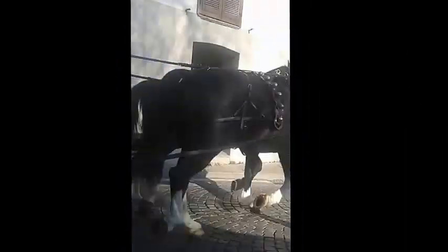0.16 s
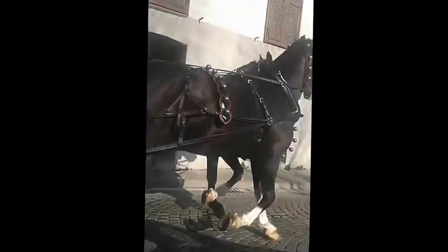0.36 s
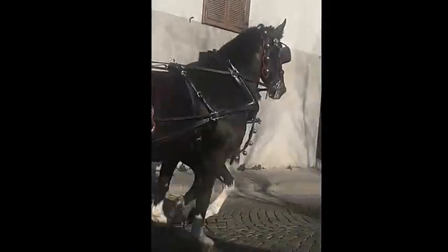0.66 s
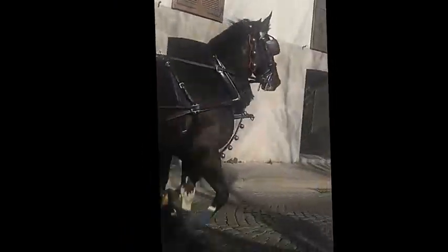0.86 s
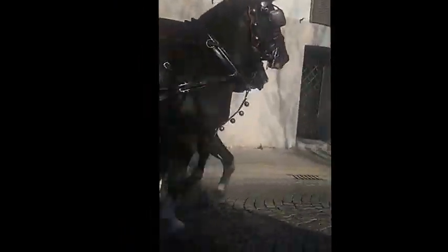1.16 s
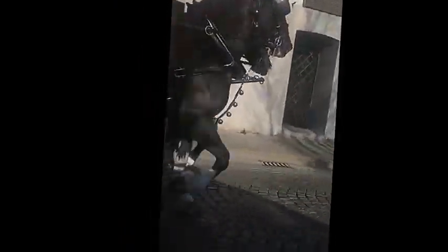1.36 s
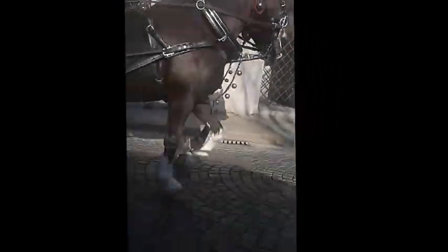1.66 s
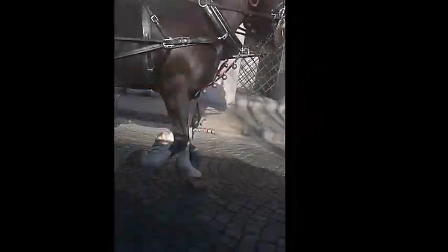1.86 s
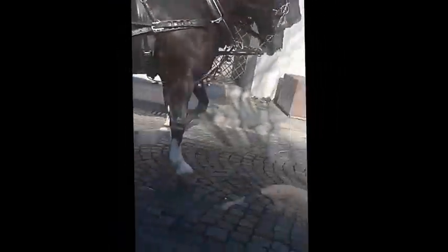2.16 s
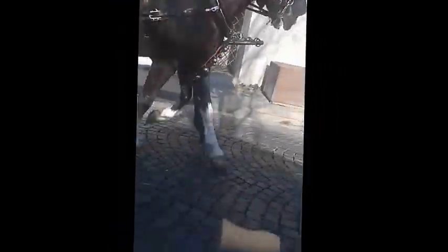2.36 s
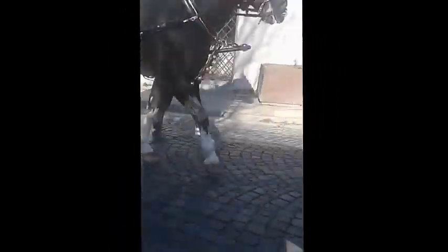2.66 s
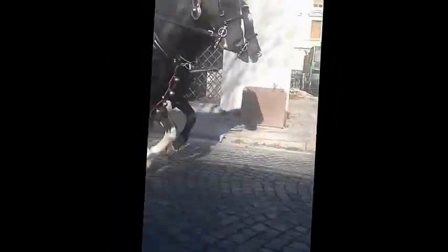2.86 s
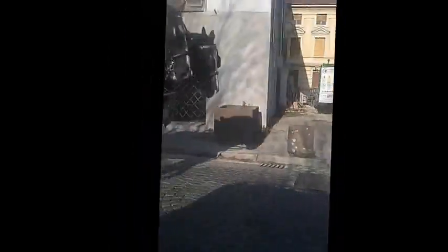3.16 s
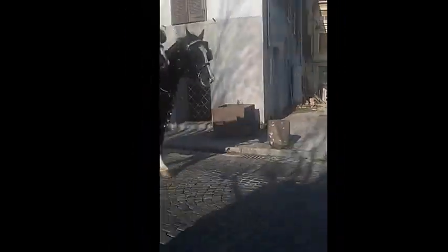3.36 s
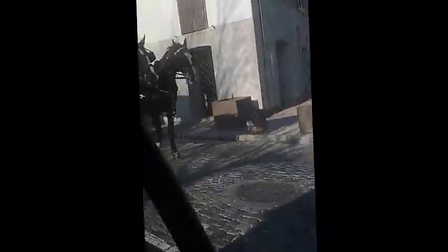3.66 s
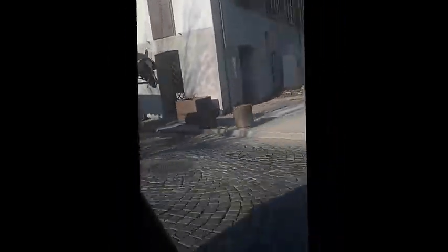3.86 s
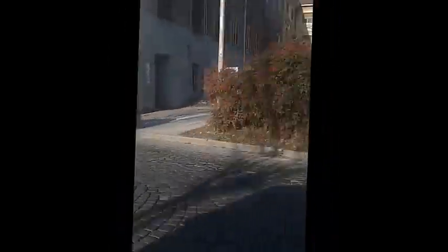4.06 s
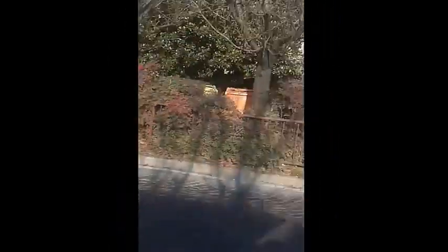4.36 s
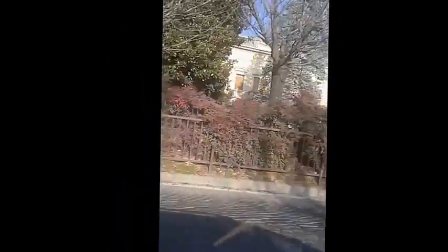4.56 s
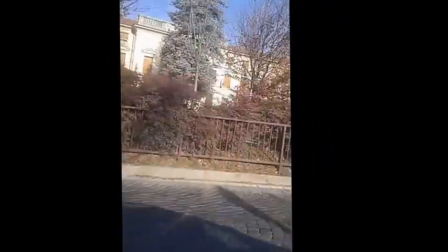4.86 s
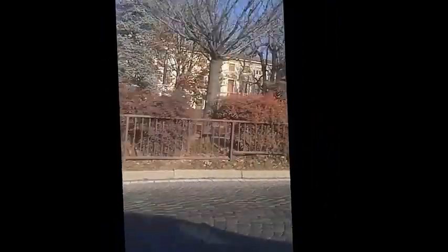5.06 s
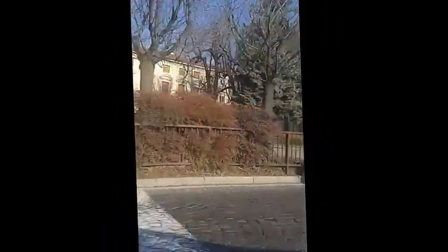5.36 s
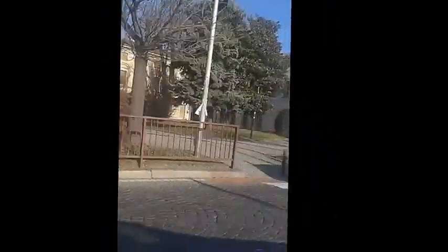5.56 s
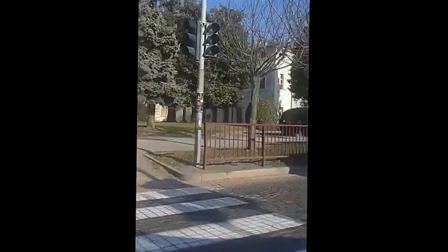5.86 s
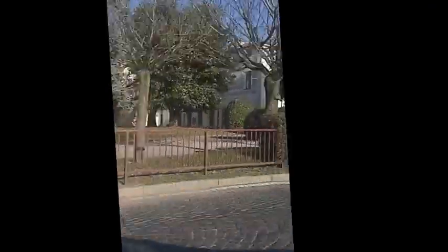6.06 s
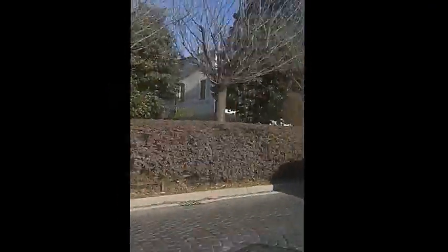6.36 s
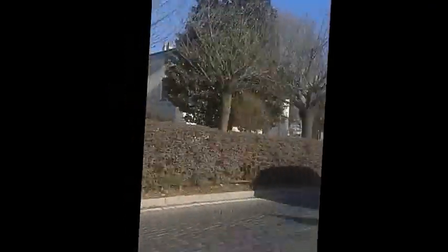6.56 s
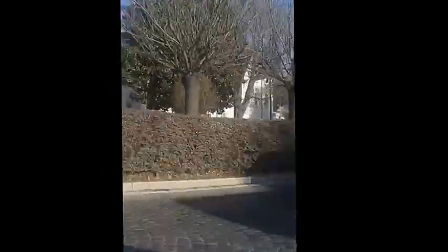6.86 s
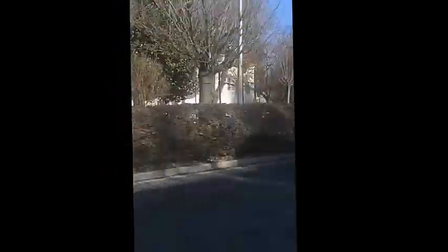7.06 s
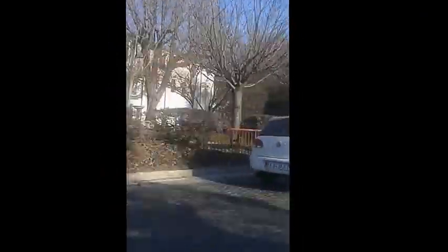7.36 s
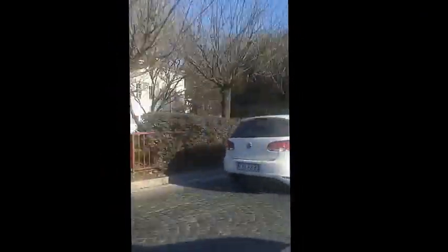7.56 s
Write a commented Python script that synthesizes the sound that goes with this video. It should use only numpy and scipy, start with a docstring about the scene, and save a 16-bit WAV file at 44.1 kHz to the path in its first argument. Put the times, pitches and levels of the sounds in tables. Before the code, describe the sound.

A car rolls slowly over cobblestones, its low rumble filling the cabin where the microphone sits. Through the glass come the faint clops of walking horses and the bright jingle of their harness. The car then accelerates and shifts gear, leaving the horses behind. The tyres drum harder on the stones, the wheels knock over bumps, and loose plastic trim buzzes, clicks and squeaks lightly.

```python
"""Inside a car that slows beside a pair of walking horses, then pulls away over cobblestones.
The stones force the body into random vibration, and the cabin air booms in a few low modes.
The engine's harmonics rise, then drop at a gear change; loose trim rattles over the bumps.
Hooves and harness, struck bodies ringing in damped modes, come faintly through the glass on the right."""
import sys
import numpy as np
from scipy import signal
from scipy.fft import rfft, irfft, next_fast_len
from scipy.io import wavfile
from scipy.ndimage import uniform_filter1d

SR = 44100
rng = np.random.default_rng(int(sys.argv[2]) if len(sys.argv) > 2 else 0)


def wrap_up_sound(samples):
    """Save the sound to the file named by the first command line argument, as 16-bit audio."""
    columns = np.atleast_2d(samples).T
    # keep every value between -1 and 1, then stretch to whole-number steps
    tamed = np.clip(columns, -1, 1)
    steps = np.round(tamed * 32767).astype(np.int16)
    wavfile.write(sys.argv[1], SR, steps)


N = 340452
TIME = np.arange(N) / SR

# Rolling level, falling and rising with the speed: time_s, level_db
ROLLING = [(0.0, -49), (0.45, -52.5), (0.65, -54.5), (1.35, -57), (2.2, -63.5), (2.8, -55), (3.3, -52),
           (4.0, -47), (4.5, -44.5), (5.6, -43), (6.2, -41.5), (7.0, -42.5), (7.4, -41), (7.72, -42)]
FULL_SPEED_DB = -43
# Spectra of the floor pan, the doors and dash, and the sprung body: frequency_hz, relative_db
FLOOR_SPECTRUM = [(47, -35), (80, -9), (146, -0.5), (225, -3.5), (264, -4.5), (279, -2.5), (307, -8),
                  (450, -17), (580, -53.5), (990, -120)]
PANEL_SPECTRUM = [(210, -29.5), (350, -4), (520, -10.5), (1040, -22.5), (1200, -21), (1400, -29),
                  (1810, -31.5), (2310, -37), (2740, -46), (3000, -51), (3900, -78), (6600, -120)]
SPRING_SPECTRUM = [(15, -72), (25, -25), (31, -29), (39, -9), (50, 8.5), (62, -5), (79, -9.5), (95, -6),
                   (130, -47)]
# Air modes of the cabin: frequency_hz, width_hz, boost_db
CABIN_MODES = [(107, 16, 2), (162, 27, 4), (265, 21.5, 8.5), (335, 22, 4), (387, 22, -4.5)]
# Rough patches of stones: start_s, length_s, panels_db, trim_db
BUMPS = [(0.0, 0.069, -57, -100), (0.3, 0.24, -60, -78), (0.94, 0.12, -70, -85), (1.33, 0.17, -69, -100),
         (1.62, 0.16, -71.5, -79), (1.87, 0.082, -67.5, -96), (2.169, 0.065, -65, -101),
         (2.337, 0.39, -66.5, -101), (2.97, 0.083, -59, -96), (3.064, 0.16, -62, -87),
         (3.338, 0.34, -62.5, -77.5), (3.668, 0.17, -59.5, -82), (3.847, 0.3, -58.5, -93),
         (4.211, 0.054, -61, -93), (4.51, 0.098, -65, -78), (4.674, 0.26, -55.5, -69.5),
         (4.993, 0.11, -53.5, -82), (5.392, 0.33, -54, -69.5), (5.641, 0.15, -53.5, -71),
         (5.846, 0.23, -58.5, -72), (5.99, 0.22, -59, -70), (6.042, 0.41, -66, -68.5),
         (6.427, 0.3, -60.5, -68.5), (6.66, 0.3, -54.5, -66), (7.024, 0.16, -64, -73.5),
         (7.162, 0.092, -58, -81), (7.383, 0.19, -57.5, -75), (7.496, 0.14, -58.5, -72),
         (7.62, 0.31, -59, -69.5)]

def tyres():
    """Forced vibration: dense impacts act as noise that drives the cabin air, panels and springs."""
    boom = noise(FLOOR_SPECTRUM, size=4096, patchy_db=1.05, peaks=CABIN_MODES)
    panels = noise(PANEL_SPECTRUM, size=512, patchy_db=1.68, flicker_db=.8)
    heave = noise(SPRING_SPECTRUM, size=4096, patchy_db=2.5)
    return (rolling_gain(FULL_SPEED_DB, slope=1) * boom
            + bumpy_gain(-58.5, slope=.99, column=2) * panels
            + rolling_gain(-61, slope=.71) * heave)


# Course of the engine: time_s, twice_firing_hz, boom_db, hum_db
ENGINE = [(2.33, 68.65, -81, -74), (2.41, 81.7, -63, -79), (2.5, 101.3, -56, -70.5),
          (2.6, 101.6, -51.5, -72.5), (2.68, 95.7, -78, -71.5), (2.77, 88.1, -78, -76),
          (3.23, 97.9, -58.5, -74), (3.57, 113.5, -54, -72), (3.9, 125.5, -54.5, -65.5),
          (4.04, 126.6, -57, -64), (4.18, 102.3, -74, -79), (4.37, 111.6, -52, -73), (4.7, 117.4, -68, -73)]
# Resonances of the intake: frequency_hz, gain_db
INTAKE = [(300, -14), (410, -2), (500, 0), (630, -17), (760, -12), (890, -18), (1050, -30)]

def engine():
    """Periodic excitation: a boom at twice the firing rate, with harmonics shaped by the intake."""
    hz, boom_db, hum_db, gate = curves(ENGINE)
    uneven = drift((2, N), 1500)  # firings differ
    phase = 2 * np.pi * np.cumsum(hz * (1 + .004 * uneven[0])) / SR
    hum = sum(amp(at_frequency(INTAKE, k * hz)) * np.cos(k * phase + k * k) for k in range(3, 10))
    boom = amp(boom_db + 2 * uneven[0]) * np.sin(phase)
    return gate * (boom + np.sqrt(2) * amp(hum_db + 1.5 * uneven[1]) * hum)


# Wheels dropping off stones: start_s, gain_db, pitch_hz
KNOCKS = [(0.029, -70, 471), (0.329, -63, 560), (0.387, -55, 520), (0.449, -62, 580), (0.978, -70, 700),
          (2.195, -71, 485), (3.005, -65, 464), (3.117, -72, 560), (3.363, -63, 495), (4.817, -51, 600),
          (5.035, -57, 630), (5.285, -56, 795), (5.548, -54, 600), (6.296, -58, 900), (6.779, -56, 522),
          (7.438, -60, 600)]

def suspension():
    """Impulse response: each jolt excites heavily damped modes, giving a dull, rough knock."""
    out, t = np.zeros(N), np.arange(3500) / SR
    for s, db, hz in KNOCKS:
        jolt = rng.standard_normal(len(t)) * np.exp(-t / .005)
        body = [(hz, 300, 0), (hz * 1.6, 500, -3)]
        knock = 1.1 * ring(t, hz, .07) + .5 * ring(t, hz * 1.45, .04) + 4 * modes(modes(jolt, body), body)
        add(out, s, amp(db) * knock * attack(t, .0006))
    return out


# Buzz of loose trim: frequency_hz, relative_db
TRIM_SPECTRUM = [(350, -28.5), (600, -13.5), (860, -16), (1060, -8.5), (1860, -18), (2090, -22),
                 (2960, -21), (6080, -29.5), (10600, -26), (13000, -31)]

def trim_rattle():
    """Contact chatter: loose parts buzz and click, hardest over the bumps."""
    buzz = noise(TRIM_SPECTRUM, size=256, patchy_db=2, flicker_db=2.3)
    ticking = unit_rms(bandpass(clicks(900, .8), 2500, 11500, order=2))
    chatter = resonance(clicks(250, 2.2), [(3360, 120, 1), (4120, 64, .11), (4570, 130, 0)])
    return bumpy_gain(-77, slope=.8, column=3) * (buzz + .07 * ticking + amp(-17.5) * chatter)


# Rough whir near 3 kHz: time_s, level_db
WHIR = [(3.3, -106), (5.5, -92), (6.8, -89), (7.72, -88)]
# Brief rubs of the trim: start_s, level_db
SQUEAKS = [(5.725, -81), (6.105, -76), (6.125, -82), (6.15, -80), (6.486, -77), (6.605, -78), (6.745, -79),
           (6.838, -79), (6.968, -81), (6.998, -79), (7.049, -79), (7.087, -81), (7.122, -85), (7.163, -82),
           (7.203, -82), (7.293, -84), (7.345, -81), (7.41, -79), (7.435, -79), (7.472, -82), (7.535, -77),
           (7.625, -82), (7.687, -76)]
# The squeaks settle lower: time_s, pitch_hz
SQUEAK_PITCH = [(6.15, 3340), (6.45, 3000)]

def trim_squeaks():
    """Friction: rubbing trim excites a narrow resonance in short squeaks, over a fluttering whir."""
    whir_db, gate = curves(WHIR)
    flutter_db = 2 * drift(N, 1300)
    out = gate * amp(whir_db + flutter_db) * resonance(clicks(1500, 1.5), [(3020, 150, 0)])
    envelope = swell(.026, peak=.16)
    for s, db in SQUEAKS:
        hz = np.interp(s, *np.transpose(SQUEAK_PITCH))
        rub = resonance(rng.standard_normal(len(envelope)), [(hz, 220, 0)])
        add(out, s, amp(db) * envelope * rub * pan(-2.2))
    return out


# Plastic snaps: start_s, gain_db, left_minus_right_db
SNAPS = [(6.1963, -82, 3), (6.3152, -69, 3.5)]
# Slaps of loose trim: start_s, gain_db
SLAPS = [(4.737, -68), (4.817, -73), (5.285, -77), (5.532, -66.5), (5.674, -74), (6.746, -73)]
# Modes of a snap and of a slap: frequency_hz, width_hz, gain_db
SNAP_MODES = [(3460, 410, -0.5), (5630, 2000, 0), (10900, 2100, -1), (14100, 1340, 24)]
SLAP_MODES = [(1700, 1200, -4), (3300, 1300, 11), (7500, 6500, 2)]

def trim_impacts():
    """Transient excitation: short bursts of noise drive the broad modes of damped plastic."""
    out, t = np.zeros((2, N)), np.arange(600) / SR
    for s, db, left_db in SNAPS:
        strike = burst(t, .0017)
        snap = sum(amp(gain_db) * resonance(strike, [(hz, width, 0)]) for hz, width, gain_db in SNAP_MODES)
        add(out, s, amp(db) * snap * pan(-left_db / 2))
    t = np.arange(2000) / SR
    for s, db in SLAPS:
        strike = burst(t, .011) * attack(t, .001)
        add(out, s, amp(db) * modes(strike, SLAP_MODES) * pan(-1.5))
    return out


# Hooves on stone: start_s, gain_db, pitch_hz, t60_s
CLOPS = [(0.0813, -79, 1010, .09), (0.1963, -71, 1620, .09), (0.225, -65, 1145, 0.066),
         (0.447, -67, 1140, 0.13), (0.653, -69, 1640, .06), (0.666, -67, 1350, 0.075),
         (0.907, -65, 1135, 0.067), (1.117, -75, 1590, .09), (1.159, -70, 1176, 0.12),
         (1.32, -63, 1250, 0.023), (1.375, -74, 1240, .07), (1.418, -75, 1030, .2),
         (1.582, -74, 1150, 0.22), (1.6515, -72, 1150, 0.097), (1.6762, -62, 1157, 0.091),
         (1.898, -63.5, 1364, 0.13), (1.969, -67, 923, .07), (2.222, -71, 1330, 0.087),
         (2.291, -68.5, 1243, 0.11), (2.4438, -66.5, 970, 0.081), (2.501, -67, 1330, 0.12),
         (2.817, -73, 1270, .09), (2.8608, -69, 1320, .09), (2.9287, -69.5, 1320, .09),
         (3.003, -69, 950, .09), (3.102, -70, 1260, 0.074), (3.272, -69, 980, .09)]

def hoof_clops():
    """Damped modes: the hollow of the hoof rings, falling in pitch as it seats and crushes grit."""
    out, t = np.zeros((2, N)), np.arange(4000) / SR
    sharp_share, settle_s = .1, .01
    seat = t + sharp_share * settle_s * attack(t, settle_s)  # warped time: the pitch starts high
    for s, db, hz, t60 in CLOPS:
        hollow = (ring(seat, hz, t60) + .35 * ring(seat, hz * 1.2, t60 * 1.05)
                  + .5 * ring(seat, hz * 1.3, t60 * .36))
        grit = rng.standard_normal((2, len(t))) * amp(-60 * t / .15)
        clack = modes(grit, [(hz * 1.2, 500, 0), (1900, 900, -4)])
        add(out, s, amp(db) * (hollow + .45 * clack) * attack(t, .00052) * pan(.8))
    return out


# Iron shoes and buckles: start_s, gain_db, pitch_hz
CLINKS = [(0.042, -54.5, 10300), (0.2044, -58, 9800), (0.2238, -54, 10600), (0.6584, -62, 10500),
          (0.896, -59, 10400), (1.372, -59, 10600), (1.6372, -57, 10200), (2.4848, -61, 10900),
          (0.3444, -60, 11500), (0.5656, -62, 10700), (0.683, -52.5, 10600), (0.905, -57, 10100),
          (1.115, -55, 10200), (1.1607, -52.5, 11400), (1.601, -59.5, 10200), (1.6726, -55.5, 10200),
          (1.8953, -49.5, 10100), (1.969, -58, 10200), (2.1523, -63, 9100), (2.152, -64, 5960),
          (2.208, -58.5, 11500), (2.4104, -63.5, 8800), (2.504, -59, 9150), (2.803, -57.5, 10400),
          (2.828, -63, 11900), (3.108, -60.5, 8900)]

def iron_clinks():
    """Hard impact: a brief contact excites a high resonance of the metal."""
    out, t = np.zeros((2, N)), np.arange(4000) / SR
    for s, db, hz in CLINKS:
        clink = modes(burst(t, .0052), [(hz, 900, 0), (8000, 6000, -12)])
        add(out, s, amp(db) * clink * pan(3))
    return out


# Grit dragged under a hoof: start_s, gain_db, length_s
SCRAPES = [(0.19, -74, 0.037), (0.399, -75, 0.079), (0.628, -76, 0.074), (0.877, -75.5, 0.06),
           (1.109, -80, 0.077), (1.36, -77.5, 0.048), (1.62, -75, 0.059), (1.892, -79, 0.041),
           (1.947, -79.5, 0.058), (2.201, -87, 0.055), (2.277, -81, 0.027), (2.421, -81, 0.046),
           (2.477, -78.5, 0.051), (2.603, -82, 0.025), (2.795, -83, 0.056)]

def hoof_scrapes():
    """Sliding friction: broadband noise, coloured by the hollow of the hoof."""
    out = np.zeros((2, N))
    for s, db, length in SCRAPES:
        size = round(length * SR)
        grit = bandpass(rng.standard_normal((2, size)), 1000, 11800, order=3)
        scrape = grit + modes(grit, [(1480, 500, 14.1), (10200, 1900, 5.4)])
        add(out, s, amp(db) * scrape * signal.windows.tukey(size, .6))
    return out


def street_echoes(sound):
    """Early reflections: house fronts return delayed copies, the later ones weaker."""
    response = np.zeros((2, 3000))
    response[:, 0] = 1
    delays = rng.integers(300, 3000, (14, 2)).T
    heights = .35 * np.exp(-delays / SR / .017) * rng.choice([-1, 1], delays.shape)
    np.put_along_axis(response, delays, heights, 1)
    return signal.oaconvolve(sound, response, axes=1)[:, :N]


# Jingle as the horses drop behind: time_s, gain_db
HARNESS_GAIN = [(0.0, -83), (0.6, -90.5), (2.0, -87), (2.2, -97.5), (3.5, -88.5), (4.0, -96)]
# Buckles and chains: frequency_hz, width_hz, gain_db, pitch_scatter_ratio
BUCKLE_MODES = [(9270, 70, 4, 0.025), (10100, 85, 7.5, 0.02), (10900, 65, -5, .035)]
# Heavier links and the topmost ring: frequency_hz, width_hz, gain_db
LINK_MODES = [(1180, 39, -13), (2400, 75, 0), (6000, 96, -3)]
SHIMMER_MODES = [(14900, 110, -4.5), (14950, 130, 0)]
# Shakes between strides: start_s, length_s
SHAKES = [(0.057, 0.13), (0.257, 0.37), (0.51, 0.11), (0.736, 0.2), (0.96, 0.11), (1.19, 0.21),
          (1.445, 0.14), (1.687, 0.21), (1.96, 0.22), (2.205, 0.29), (2.455, .12), (2.667, 0.048),
          (2.84, 0.081)]

def harness():
    """Superposition: random collisions ring many small metal parts; the jingle swells with each shake."""
    gain_db, gate = curves(HARNESS_GAIN)
    span, chinks, links = np.count_nonzero(gate), 0, 0
    for hz, width, db, scatter in BUCKLE_MODES:
        for detune in scatter * np.linspace(-1, 1, 5):
            chinks += amp(db) * resonance(clicks(30, 3.2, span), [(hz * (1 + detune), width, 0)])
    blur = resonance(clicks(3000, 1.6, span), [(10100, 1600, -5), (9350, 1100, -8)])  # finer parts
    jingle = .9 * unit_rms(chinks) + .42 * blur
    for hz, width, db in LINK_MODES:
        link = modes(clicks(40, 1.4, span), [(hz, width, 0)])
        links += amp(db) * unit_rms(modes(link, [(hz, 3 * width, 0)]))
    shake, passing = np.zeros((2, span))
    for start, length in SHAKES:
        add(shake, start, swell(length, peak=.2))
    add(passing, 1.5, swell(1, peak=.37))  # some parts ring out as they pass
    chime = passing * resonance(clicks(120, 2.4, span), [(5800, 89, 0), (6150, 100, 0)])
    shimmer = shake * resonance(clicks(900, 1.9, span), SHIMMER_MODES)
    out = np.zeros((2, N))
    add(out, 0, amp(5.5 * shake) * jingle * pan(3) + amp(-8.5) * links + amp(34) * shimmer * pan(-3.5))
    out *= gate * amp(gain_db)
    add(out, 0, amp(-94) * chime)
    return out


# Single rings that stand out of the jingle: start_s, gain_db, pitch_hz
GLINTS = [(.043, -76, 10700), (.062, -79, 10100), (.082, -79, 9250), (.108, -81, 9500), (.382, -80, 9600),
          (.386, -79, 10400), (.41, -75, 10150), (.427, -77, 10300), (1.012, -83, 7300)]

def harness_glints():
    """Free vibration: a struck metal part decays in a single mode."""
    out, t = np.zeros((2, N)), TIME[:4000]
    for s, db, hz in GLINTS:
        add(out, s, amp(db) * ring(t, hz, t60=.13) * attack(t, .003) * pan(-3))
    return out


# Thin bands of whine: frequency_hz, width_hz, full_speed_db
WHINE_BANDS = [(6760, 140, -95), (7280, 88, -96.5)]

def whine():
    """Narrowband noise: steady in pitch, it follows the rolling in level."""
    return sum(rolling_gain(db, slope=.78) * resonance(rng.standard_normal(N), [(hz, width, 0)])
               for hz, width, db in WHINE_BANDS)


# Likeness of the two channels: frequency_hz, correlation
COHERENCE = [(30, 0.98), (60, 1), (150, 0.98), (380, 0.99), (950, 0.68), (2380, -0.045), (5980, 0.033),
             (15000, -0.15)]

def noise(spectrum, size, patchy_db=0., flicker_db=0., peaks=()):
    """Spectral synthesis: partly coherent stereo noise with drifting patches, flicker and peaks."""
    frames, hz = 4 * N // size + 5, np.fft.rfftfreq(size, 1 / SR)
    hz = hz[hz < spectrum[-1][0]]
    a, b, c, d, patches = rng.standard_normal((frames, len(hz), 5)).T
    left, independent = a + 1j * b, c + 1j * d
    patches = unit_rms(uniform_filter1d(uniform_filter1d(patches, 6, 0), 6, 1))
    flicker = unit_rms(uniform_filter1d(rng.standard_normal(frames), 4))
    colour_db = at_frequency(spectrum, hz) + sum(db / (1 + (2 * (hz - f) / w) ** 2) for f, w, db in peaks)
    same = np.clip(at_frequency(COHERENCE, hz), -1, 1)[:, None]
    bins = np.zeros((2, size // 2 + 1, frames), complex)
    bins[:, :len(hz)] = left, same * left + np.sqrt(1 - same ** 2) * independent
    bins[:, :len(hz)] *= amp(colour_db[:, None] + patchy_db * patches + flicker_db * flicker)
    return unit_rms(signal.istft(bins, nperseg=size, noverlap=size * 3 // 4)[1][:, :N])


def rolling_gain(full_db, slope):
    """Power law: the gain moves by slope dB for each dB of rolling."""
    return amp(full_db + slope * (curves(ROLLING)[0] - FULL_SPEED_DB))


def bumpy_gain(full_db, slope, column):
    """Incoherent addition: the powers of the rolling and of the rough patches sum."""
    power = rolling_gain(full_db, slope) ** 2
    for bump in BUMPS:
        add(power, bump[0], amp(2 * bump[column]) * swell(bump[1], peak=.33) ** 4)
    return np.sqrt(power)


def clicks(per_s, spread_db, size=N):
    """Shot noise: random impulses for each ear, a few of them large."""
    out, count = np.zeros((2, size)), int(per_s * size / SR)
    height = amp(spread_db * np.minimum(rng.exponential(1, (count, 2)), 5))
    height *= rng.choice([-1, 1], (count, 2))
    np.put_along_axis(out, rng.integers(0, size, (count, 2)).T, height.T, 1)
    return out


def modes(x, table):
    """Parallel two-pole resonators: frequency_hz, width_hz, gain_db."""
    return sum(amp(db) * signal.lfilter(*signal.iirpeak(hz, hz / width, SR), x) for hz, width, db in table)


def resonance(x, table):
    """Cascaded resonators: two passes steepen the skirts; scaled to unit RMS."""
    return unit_rms(modes(modes(x, table), table))


def bandpass(x, low_hz, high_hz, order):
    return signal.sosfilt(signal.butter(order, [low_hz, high_hz], "bandpass", fs=SR, output="sos"), x)


def ring(t, hz, t60):
    return np.sin(2 * np.pi * hz * t) * amp(-60 * t / t60)


def burst(t, decay_s):
    return rng.standard_normal((2, len(t))) * np.exp(-t / decay_s)


def attack(t, rise_s):
    return 1 - np.exp(-t / rise_s)


def swell(length_s, peak):
    """A smooth rise and fall; peak is the share taken by the rise."""
    u = np.arange(0, length_s, 1 / SR) / length_s
    return np.sin(np.pi / 2 * np.minimum(u / peak, (1 - u) / (1 - peak)))


def drift(shape, samples):
    return unit_rms(uniform_filter1d(uniform_filter1d(rng.standard_normal(shape), samples), samples))


def curves(rows):
    """Columns at every sample, and a gate that is open while the table lasts."""
    s, *columns = np.transpose(rows)
    gate = np.clip(np.minimum(TIME - s[0], s[-1] - TIME + 1 / 20) * 20 + (s[0] == 0), 0, 1)
    return [np.interp(TIME, s, c) for c in columns] + [gate]


def at_frequency(points, hz):
    f, value = np.transpose(points)
    return np.interp(np.log(hz + 1), np.log(f + 1), value)


def amp(db):
    return 10 ** (np.asarray(db) / 20)


def pan(right_db):
    return amp([[-right_db], [right_db]])


def unit_rms(x):
    return x / np.sqrt(np.mean(x ** 2) + 1e-20)


def add(mix, s, sound):
    part = mix[..., round(s * SR):][..., :sound.shape[-1]]
    part += sound[..., :part.shape[-1]]


def scene():
    """Superposition: the car and the horses sum in the cabin."""
    drive = tyres() + engine()
    horses = street_echoes(hoof_clops() + iron_clinks() + hoof_scrapes()) + harness() + harness_glints()
    return drive + horses + trim_rattle() + trim_squeaks() + whine() + trim_impacts() + suspension()


# Background hiss: frequency_hz, relative_db
HISS = [(710, -20), (1200, -21), (1770, -17.5), (2690, -19), (3060, -21), (4780, -22), (6660, -23),
        (8410, -20.5), (10100, -23.5), (12300, -16.5), (16000, -69), (22000, -120)]
# Tilt between the channels: frequency_hz, left_minus_right_db
IMBALANCE = [(30, 0.1), (60, 0.5), (130, 1), (290, -0.5), (640, 0.5), (1410, -2.5), (3100, 3), (6820, -1),
             (15000, -2.5)]

def record(dry):
    """Linear filtering: hiss is added, the channels tilt apart, top treble and deepest bass are cut."""
    size = next_fast_len(N)
    hz = np.fft.rfftfreq(size, 1 / SR)
    lean_db = at_frequency(IMBALANCE, hz) / 2
    loss_db = -30 / (1 + np.exp((12400 - hz) / 250)) - 14 / (1 + (hz / 35) ** 12)
    heard = dry + amp(-85.5) * noise(HISS, size=256, patchy_db=3.5)
    heard = irfft(rfft(heard, size) * amp([loss_db + lean_db, loss_db - lean_db]), size)[:, :N]
    band_limit = signal.firwin(511, 16200, window=("kaiser", 9), fs=SR)
    return signal.oaconvolve(heard, band_limit[None], "same")


dry = scene()
out = record(dry)
wrap_up_sound(out)
```